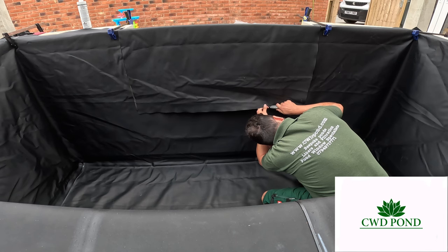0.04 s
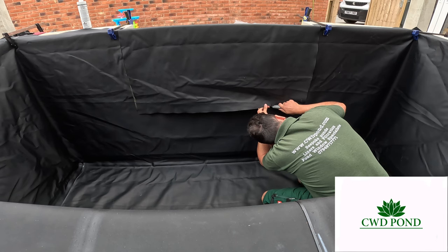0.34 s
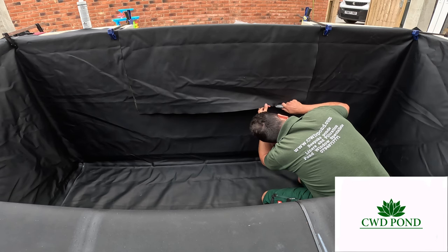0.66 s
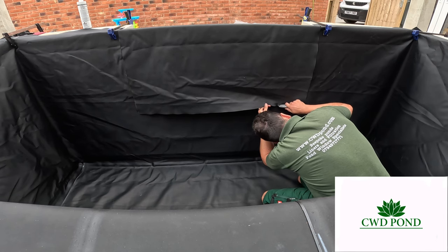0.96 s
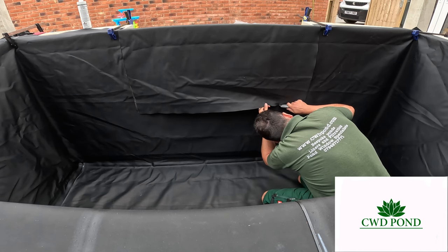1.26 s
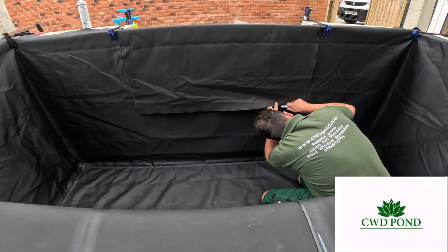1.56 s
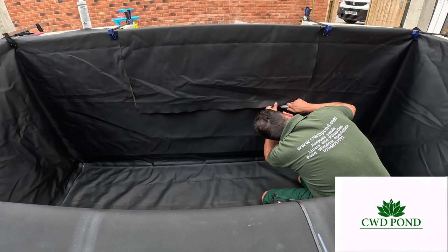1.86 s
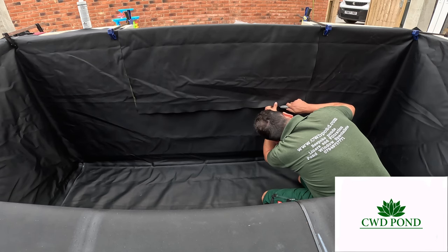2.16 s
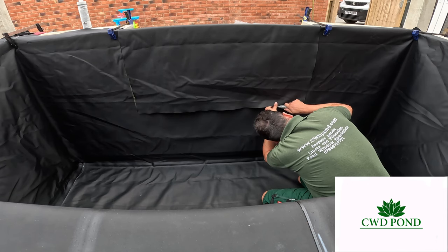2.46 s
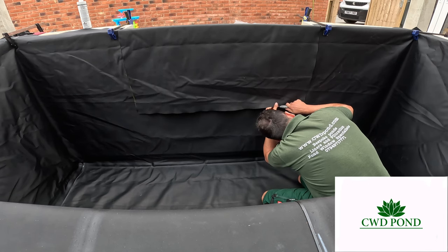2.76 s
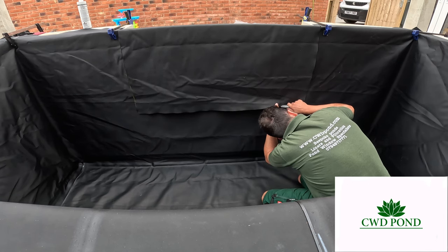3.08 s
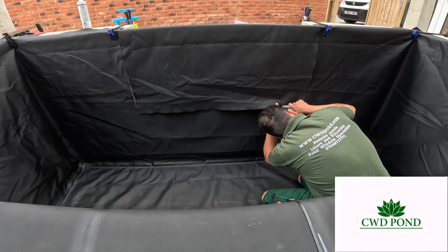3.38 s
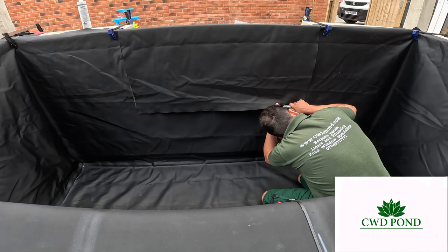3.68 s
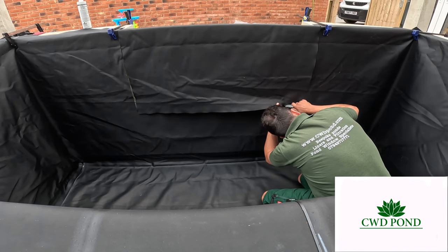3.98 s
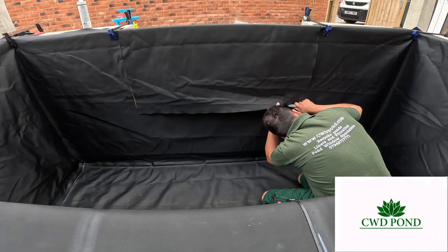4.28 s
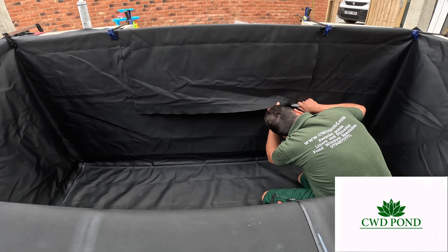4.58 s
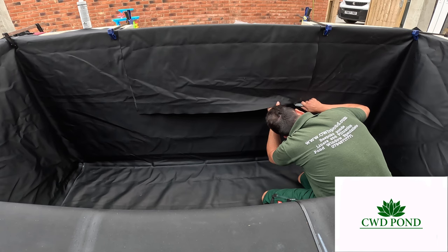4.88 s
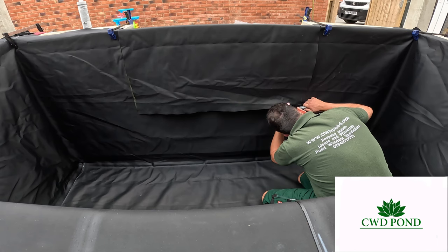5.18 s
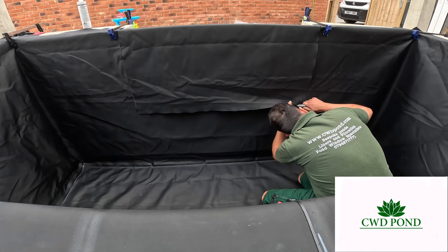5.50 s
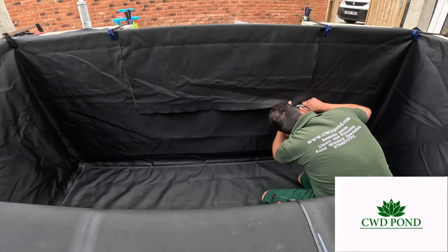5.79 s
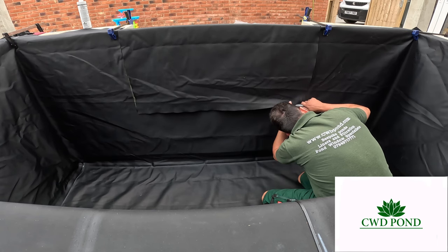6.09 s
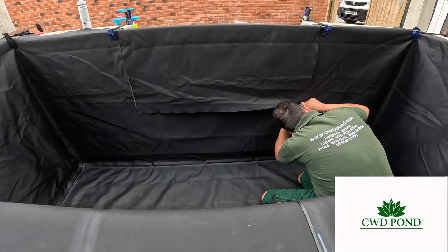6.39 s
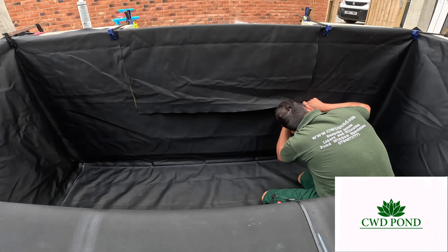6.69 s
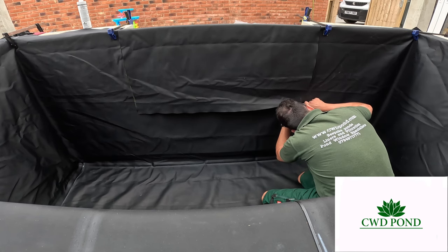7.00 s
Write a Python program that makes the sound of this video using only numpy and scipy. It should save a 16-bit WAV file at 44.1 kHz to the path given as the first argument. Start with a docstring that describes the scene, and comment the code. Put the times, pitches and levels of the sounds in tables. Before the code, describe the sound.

Short rubbery squeaks, scrapes and small dry snaps come from a liner being worked by hand, with a low engine hum outside.

```python
"""A rubber pond liner scrapes, squeaks and snaps as someone kneels in the empty pond and works along
its edge with a hand tool. Scrapes are dense trains of tiny slips, squeaks are rubber sticking and
slipping at an audible rate, and snaps are folds letting go. The lined walls throw each sound back.
Outside, an engine idles with a low hum, under light wind and distant traffic."""
import sys
import numpy as np
from scipy import signal
from scipy.fft import rfft, irfft, next_fast_len
from scipy.io import wavfile
from scipy.ndimage import uniform_filter1d, map_coordinates

SR = 44100
rng = np.random.default_rng(int(sys.argv[2]) if len(sys.argv) > 2 else 0)


def int16_out(signal):
    """Quantize to a 16-bit WAV file."""
    q = np.round(np.clip(np.atleast_2d(signal).T, -1, 1) * 32767)
    wavfile.write(sys.argv[1], SR, q.astype(np.int16))


N = 319677
TIME = np.arange(N) / SR
SQUEAK_HOLD_S = 0.00775
SNAP_LEAD = 128  # samples of room before each burst

# Short squeaks, one glide each:
# start_s, rise_s, fall_s, first_slip_hz, last_slip_hz, level_db, roughness (0-1), overtones_db
SQUEAK_GLIDES = [(1.128, .005, .008, 6500, 6900, -62, 0.25, -15),
                 (1.138, 0.014, 0.041, 9500, 8400, -66.5, 0.7, -12),
                 (1.146, 0.0054, 0.038, 4290, 3830, -61.5, 0.43, 0),
                 (1.172, 0.011, 0.017, 7200, 6630, -61, 0.3, 2),
                 (1.477, 0.005, 0.052, 1850, 1704, -53, 0.47, -19),
                 (1.548, 0.028, 0.019, 1298, 1800, -48, 0.23, -6),
                 (1.577, 0.018, 0.011, 2960, 3100, -51.5, 0.26, -21),
                 (1.617, 0.009, 0.013, 1780, 1920, -52.5, 0.34, -12),
                 (1.955, .025, 0.038, 6900, 6660, -78.5, 0.2, -18),
                 (3.172, 0.021, 0.017, 1582, 1888, -54, 0.13, 7.5),
                 (3.205, 0.005, .008, 2050, 1860, -54, 0, -6),
                 (3.218, 0.0063, 0.012, 1530, 1380, -49.5, 0.26, -9),
                 (3.253, 0.02, 0.011, 1230, 1750, -48.5, 0.29, 1.5),
                 (3.269, 0.0058, 0.011, 2200, 2020, -57, 0, -9),
                 (3.285, 0.016, 0.0057, 1700, 2120, -45, 0.1, -2),
                 (3.301, 0.015, 0.012, 3250, 3170, -50.5, .14, -2),
                 (3.331, 0.0061, .022, 2295, 1400, -48.5, .24, -1.5),
                 (3.35, 0.015, 0.032, 1392, 870, -58, 0.4, -1),
                 (3.376, 0.0068, .012, 2050, 1940, -51, 0.26, -17),
                 (3.504, 0.036, 0.018, 1303, 862, -59.5, 0.6, 4),
                 (3.563, 0.0069, 0.011, 1080, 1450, -51.5, 0, 1),
                 (3.581, 0.016, 0.026, 1560, 1897, -48.5, 0.2, -4),
                 (3.624, 0.023, 0.01, 1740, 3110, -54.5, 0.25, -2),
                 (3.655, 0.011, 0.013, 3900, 4690, -55, 0.25, -3),
                 (3.678, 0.0085, 0.0084, 4800, 5550, -56.5, 0.12, -3),
                 (3.68, 0.009, 0.022, 4250, 3500, -62.5, 0.35, -8),
                 (4.188, .004, 0.0097, 5900, 4100, -70, .3, -15),
                 (4.228, .008, 0.029, 7500, 7900, -69, .25, -18),
                 (4.498, 0.0047, 0.02, 6400, 6400, -68, .35, -19),
                 (5.249, .035, 0.042, 1290, 1360, -56.5, .5, -5),
                 (5.725, 0.013, 0.039, 6800, 6410, -71, 0.46, -9),
                 (6.221, 0.002, 0.0046, 2000, 1770, -48.5, 0.33, -25),
                 (6.579, 0.022, 0.0044, 5050, 6180, -61, 0.3, 1),
                 (6.599, .008, 0.013, 5400, 3900, -67, 0.33, 4),
                 (6.667, 0.022, 0.014, 2764, 2890, -58.5, 0.14, -4),
                 (6.68, 0.018, .04, 5600, 5450, -63, 0.24, -8),
                 (6.698, 0.011, 0.043, 3080, 3400, -62, .3, 6),
                 (7.11, 0.031, 0.026, 8600, 7670, -74, 0.37, -18),
                 (7.156, 0.02, 0.04, 7070, 4800, -64, 0.25, 0)]
# One long, thin squeal that sinks as the rubber grips, lets go for a moment, grips hard and climbs away:
# time_s, slip_hz, level_db
SQUEAL_PATH = [(3.95, 11060, -72), (4.026, 10830, -65.5), (4.075, 8640, -70.5), (4.16, 7180, -63.5),
               (4.186, 9630, -76), (4.202, 6460, -65), (4.207, 6180, -55.5), (4.246, 6420, -61),
               (4.283, 8000, -65), (4.304, 10200, -69.5), (4.325, 11030, -76), (4.455, 11200, -80)]


def scrapes():
    """Dense slips of the tool on rubber: a bright hiss plus a low rasp, balanced per stroke."""
    # Tool strokes: start_s, rise_s, hold_s, fall_s, level_db, rasp_db (relative to the level)
    strokes = [(1.13, 0.062, 0.021, 0.069, -68.5, -4), (1.46, 0.016, 0.031, 0.13, -71.5, 14.5),
               (1.485, 0.065, 0.067, 0.039, -58, -0.5), (3.161, 0.013, 0.022, .04, -73, 16.5),
               (3.226, 0.072, 0.028, 0.05, -48, -15), (3.323, 0.022, 0.057, 0.015, -55.5, -0.5),
               (3.452, 0.027, 0.06, .045, -59, 1.5), (3.519, 0.055, 0.037, 0.088, -53, -9),
               (5.187, 0.036, 0.065, .071, -69.5, 3), (5.238, 0.078, 0.035, 0.11, -65, 0.5),
               (5.421, 0.025, 0.013, 0.048, -67, -3), (6.57, 0.018, .024, 0.027, -69, -13),
               (6.677, 0.028, .03, 0.084, -64, -18)]
    # Tone of the friction: freq_hz, gain_db
    scrape_eq = [(400, -44), (750, -25), (1100, -0.5), (1700, -5.5), (2400, -5.5), (3100, -4), (4000, -4),
                 (5600, -6), (7600, -9.5), (10500, -20), (13000, -32), (15000, -41), (18000, -70)]
    grit = ring(coloured(slips(N, per_s=4000, spread_db=2.0), scrape_eq))
    hiss = unit_rms(signal.sosfilt(signal.butter(4, 2400, "high", fs=SR, output="sos"), grit))
    rasp = unit_rms(signal.sosfilt(signal.butter(3, [900, 2300], "band", fs=SR, output="sos"), grit))
    hiss_power, rasp_power = np.zeros((2, N))
    for start, rise, hold, fall, db, rasp_db in strokes:
        push = swell(rise, hold, fall, depth_db=21.5)
        add(hiss_power, start, (push * gain_of(db)) ** 2)
        add(rasp_power, start, (push * gain_of(db + rasp_db)) ** 2)
    return np.sqrt(hiss_power) * hiss + np.sqrt(rasp_power) * rasp


def scrape_ducking():
    """A gain that ducks the scraping while the rubber locks into a clean squeak."""
    locked = np.zeros(N)
    for start, rise, fall, _, _, _, rough, _ in SQUEAK_GLIDES:
        purity = np.clip(1 - rough / .5, 0, 1)
        add(locked, start, swell(rise, SQUEAK_HOLD_S, fall, depth_db=0) * purity)
    return 1 - .7 * np.minimum(locked, .7)


def slips(count, per_s, spread_db):
    """Friction as a random train of tiny clicks of uneven size."""
    slipping = rng.random(count) < per_s / SR
    size = np.minimum(rng.exponential(1, count), 4)
    sign = rng.choice([-1., 1.], count)
    return unit_rms(slipping * sign * gain_of(spread_db * size))


def ring(x, tuning=1, boost_db=0):
    """Narrow resonant peaks give scrapes and snaps a hollow, ringing colour."""
    # Peaks at tuning 1: pitch_hz, width_hz, gain_db
    resonances = [(1590, 47, 3), (1775, 44, 8), (2040, 50, 5), (2660, 51, 2), (2870, 40, -8),
                  (4300, 41, -17.5), (5050, 26, 2.5), (5450, 73, -1.5), (6520, 72, -7), (6800, 51, -3.5),
                  (7530, 83, -6), (9050, 45, -13)]
    out = x.copy()
    for hz, width, db in resonances:
        peak = signal.iirpeak(hz * tuning, hz / width, fs=SR)
        out += gain_of(db + boost_db) * signal.lfilter(*peak, x)
    return out


def squeaks():
    """Each squeak swells and fades, juddering and shedding grit while its slip rate glides."""
    # Tone of the grains that each catch tears loose: freq_hz, gain_db
    grit_eq = [(600, -31.5), (1500, -8), (2300, 0), (3200, 3), (4500, 4), (7500, -11.5), (11000, -23),
               (16000, -49)]
    out = np.zeros(N)
    for start, rise, fall, first_hz, last_hz, db, rough, overtones_db in SQUEAK_GLIDES:
        push = swell(rise, SQUEAK_HOLD_S, fall, depth_db=9.5)
        count = len(push)
        push *= np.minimum(TIME[:count] / (0.27 * rise), 1)  # fade in from silence
        catches, bend = judder(per_s=np.full(count, 240), decay_s=.0052, octaves=.046)
        hz = np.geomspace(first_hz, last_hz, count) * bend
        grit = gain_of(-20) * coloured(catches * slips(count, per_s=1500, spread_db=1), grit_eq)
        tone = catches * stick_slip(hz, rough, overtones_db)
        add(out, start, push * gain_of(db) * (tone + grit))
    return out


def stick_slip(hz, rough, overtones_db):
    """Rubber sticks and slips hz times a second; an unsteady grip smears pitch and overtones."""
    # Weight of the partials, taken relative to the fundamental: freq_hz, gain_db
    partial_eq = [(900, 7), (1700, 2.5), (2500, -3.5), (3400, -4.5), (4200, -7), (6000, -4), (8000, -13.5),
                  (11000, -23.5), (15000, -42), (18000, -59)]
    rough, count = np.clip(rough, 0, 1), len(hz)
    phase = phase_of(hz * (1 + 0.172 * rough * wander(count, rate_hz=1200)))
    tone = np.zeros(count)
    for k in range(1, 9):
        db = curve_at(partial_eq, k * hz) - curve_at(partial_eq, hz) + (k > 1) * overtones_db
        # uneven slips spread each partial into a rasp, the high ones most
        smear = rough * k ** .35 * (k * hz / 1300) ** .45
        shake = wander(count, rate_hz=1600) + 1j * wander(count, rate_hz=1800)
        shaken = (1 + smear * shake / np.sqrt(2)) * np.exp(1j * k * phase)
        partial = shaken.real / np.sqrt(1 + smear ** 2)
        tone += (k * hz < SR / 2) * gain_of(db) * partial
    return tone


def judder(per_s, decay_s, octaves):
    """Uneven catches of the grip, each a quick rise and a decay: returns envelope and pitch factor."""
    count, spread_db = len(per_s), 2.4
    uneven_rate = per_s * np.exp(wander(count, rate_hz=200) / 2)
    catch_index = np.cumsum(uneven_rate / SR).astype(int)
    size, pitch = np.clip(rng.standard_normal((count, 2)), -2, 2)[catch_index].T
    age_s = (np.arange(count) - np.searchsorted(catch_index, catch_index)) / SR
    envelope = gain_of(spread_db * size) * np.exp(-age_s / decay_s)
    return unit_rms(uniform_filter1d(envelope, size=24)), 2 ** (octaves * pitch)


def squeal():
    """A long, light drag: scratchy chirps crowd into one tone as the rubber grips, then scatter again."""
    full_grip_hz = 6260
    times, hz, db = np.transpose(SQUEAL_PATH)
    out, t = np.zeros(N), np.arange(times[0], times[-1], 1 / SR)
    slip_hz = np.interp(t, times, hz)
    # the lighter the grip, the higher and rougher the squeal and the rarer its catches
    slack = np.maximum(np.log2(slip_hz / full_grip_hz), 0)
    catches_per_s = 300 * (full_grip_hz / slip_hz) ** 2.5
    catches, bend = judder(catches_per_s, decay_s=.0024, octaves=.06 * (0.314 + slack))
    catches = unit_rms(catches ** np.minimum(0.35 + 1.5 * slack, 1))  # a firm grip hardly lets go
    tone = stick_slip(slip_hz * bend, rough=0.093 + 0.44 * slack, overtones_db=-1)
    add(out, times[0], gain_of(np.interp(t, times, db)) * catches * tone)
    damping = signal.butter(5, 12200, fs=SR, output="sos")  # soft rubber damps the very top
    return signal.sosfilt(damping, out + stray_chirps())


def stray_chirps():
    """Beside the long squeal, other spots of the rubber catch for a moment, mostly at a higher pitch."""
    per_s, length_s = 170, .005
    times, hz, db = np.transpose(SQUEAL_PATH)
    out, progress = np.zeros(N), np.arange(0, length_s, 1 / SR) / length_s
    envelope = np.sin(np.pi * np.sqrt(progress)) ** 2
    for start in rng.uniform(times[0], times[-1], round(per_s * (times[-1] - times[0]))):
        pitch, glide, size = np.clip(rng.standard_normal(3), -1.7, 1.7)
        octaves_up = .11 + .14 * (pitch + glide * (progress - .5) / 2)
        slip_hz = np.interp(start, times, hz) * 2 ** octaves_up
        level_db = min(np.interp(start, times, db), np.median(db)) - 1.5 + 2.5 * size
        add(out, start, gain_of(level_db) * envelope * np.sin(phase_of(slip_hz)))
    return out


def snaps():
    """Each fold lets go with a dry crack and a brief ring, tuned a little differently each time."""
    # Folds letting go, plus one faint tonal ping at 4.4 s: start_s, level_db, centre_hz, width_octaves,
    # decay_s, crack_db (relative)
    folds = [(0.261, -57.5, 2500, 1.4, 0.004, -14), (0.48, -66, 4500, 1.7, .003, -6),
             (1.477, -44.5, 2900, 1.4, 0.0026, -16), (1.759, -50, 1900, 0.7, 0.0063, -15),
             (1.768, -46, 3820, 0.78, 0.0036, -11), (2.213, -62, 2480, 1.3, 0.014, -11),
             (2.265, -47.5, 2310, 0.91, 0.006, -17), (2.713, -40.5, 5360, 0.58, 0.0033, -12.5),
             (3.129, -55.5, 5500, 6.9, 0.0046, -19), (4.397, -63.5, 5240, 0.37, 0.019, -17),
             (5.223, -55, 1355, 0.83, 0.0049, -6), (5.953, -56.5, 1920, 1.3, 0.017, -10),
             (6.221, -55.5, 4700, 0.13, 0.0065, -19), (6.435, -50, 4480, 0.77, 0.0049, -7),
             (6.718, -49, 2150, 0.084, 0.0043, -20), (6.754, -57, 4255, 0.25, .0069, -15),
             (6.882, -48.5, 1490, 0.6, 0.0052, -13)]
    out = np.zeros(N)
    for start, db, hz, octaves, decay, crack_db in folds:
        body = gain_of(db - 3) * snap_body(hz, octaves, decay)
        ringing = ring(body, tuning=rng.normal(1, 0.066), boost_db=0.5)
        add(out, start - SNAP_LEAD / SR, ringing + gain_of(db + crack_db) * crack())
    return out


def snap_body(centre_hz, octaves, decay_s):
    """A quick, dying burst of slips in one band; small folds sound higher."""
    burst = slip_burst(rise_s=0.00082, decay_s=decay_s)
    hz = bins(burst)
    band = np.exp(-.5 * (np.log2((hz + 1) / centre_hz) / octaves) ** 2)
    band /= 1 + (hz / 10500) ** 10  # roll off the top
    flex = np.exp(-.5 * (np.log2((hz + 1) / 1300) / 0.49) ** 2)  # broad snaps also flex the sheet
    return irfft(rfft(burst) * unit_rms(band + 0.33 * octaves * flex))


def crack():
    """The dry, bright edge of a snap: a burst a few milliseconds long."""
    # Tone of the crack: freq_hz, gain_db
    crack_eq = [(500, -22), (3000, 0), (6500, 2), (9500, -12.5), (11000, -11.5), (13000, -29),
                (15000, -35.5), (18000, -60)]
    burst = slip_burst(rise_s=0.00055, decay_s=.003)
    return irfft(rfft(burst) * unit_rms(gain_of(curve_at(crack_eq, bins(burst)))))


def slip_burst(rise_s, decay_s):
    """White noise with a fast attack and an exponential decay, SNAP_LEAD samples in."""
    t = TIME[:8192]
    envelope = (1 - np.exp(-t / rise_s)) * np.exp(-t / decay_s)
    return np.roll(rng.choice([-1., 1.], len(t)) * envelope, SNAP_LEAD)


def knocks():
    """The heavy rubber answers a blow of the tool with a few low, well-damped modes."""
    # Blows: start_s, level_db
    blows = [(1.478, -55), (2.268, -54.5), (5.224, -49), (5.955, -55), (6.884, -60.5)]
    # Modes of the sheet, detuned at each blow: pitch_hz, gain_db, t60_s
    modes = [(767, -9, 0.035), (1025, -10.5, 0.033), (1190, -2.5, 0.048), (1400, -5, 0.03)]
    out, t = np.zeros(N), TIME[:4096]
    for start, db in blows:
        for hz, mode_db, t60 in modes:
            tone = np.sin(2 * np.pi * hz * rng.normal(1, 0.052) * t)
            add(out, start, gain_of(db + mode_db - 60 * t / t60) * tone)
    return out


def hand_slides():
    """A light touch gives a fine hiss that crinkles as the hand crosses small folds."""
    # Passes over the sheet: start_s, rise_s, hold_s, fall_s, level_db
    passes = [(0.254, 0.43, 0.22, 0.24, -74.5), (0.953, 0.2, 0.059, 0.068, -71),
              (3.846, 0.59, 0.051, 0.091, -72), (4.551, 0.35, 0.11, 0.076, -74)]
    # Tone of the hiss: freq_hz, gain_db
    slide_eq = [(400, -37), (900, -2), (1900, 6.5), (2800, 0.5), (4000, -4), (6500, -2), (8500, -12),
                (10500, -14), (13000, -26), (17000, -44)]
    out = np.zeros(N)
    for start, rise, hold, fall, db in passes:
        touch = swell(rise, hold, fall, depth_db=5)
        crinkle_db = 1.8 * wander(len(touch), rate_hz=45)
        hiss = coloured(slips(len(touch), per_s=2400, spread_db=0.5), slide_eq)
        add(out, start, touch * gain_of(db + crinkle_db) * hiss)
    return out


def pond_echoes(x, spots=4, move_s=.33):
    """Direct sound plus echoes that crossfade as the hand moves from spot to spot."""
    out = np.array([x, x])
    for spot in range(spots):
        away = np.abs((TIME / move_s - spot) % spots - spots / 2)
        crossfade = np.cos(np.pi / 2 * np.minimum(away, 1))
        out += signal.oaconvolve((x * crossfade)[None], wall_response(), axes=1)[:, :N]
    return out


def wall_response():
    """From one spot the near walls answer within milliseconds, then a short diffuse tail dies away."""
    # Early reflections off walls and floor: delay_s, left_db, right_db
    reflections = [(.00092, -20.5, -27.5), (.0032, -8, -22), (.0052, -24.5, -8), (.0087, -19.5, -15.5),
                   (0.0097, -17, -25)]
    # Decay time of the pond: freq_hz, t60_s
    decay_times = [(200, 0.39), (1500, 0.15), (6000, 0.16), (13000, 0.16)]
    early = np.zeros((2, 12000))
    for delay, *sides_db in reflections:
        early[:, round(delay * rng.uniform(.85, 1.15) * SR)] += gain_of(sides_db)
    hz, t, noise = signal.stft(rng.standard_normal(early.shape), SR, nperseg=128)
    decay = gain_of(-60 * t / curve_at(decay_times, hz)[:, None])
    onset = np.clip(t / 0.0013, 0, 1)
    tail = signal.istft(noise * decay * onset, SR, nperseg=128)[1][:, :early.shape[1]]
    tail = tail + 0.29 * tail[::-1]  # crossfeed narrows the image
    return early + gain_of(-1.0) * tail / np.linalg.norm(tail[0])


def engine():
    """An idling engine: from afar only the firing rate and a few weak, wavering orders carry."""
    # Idle speed: time_s, firing_hz
    firing = [(0, 78.55), (.48, 76.4), (1.39, 75.93), (4.1, 76.23), (4.26, 76.8), (7.25, 74.8)]
    # Harmonics of the firing rate: multiple, relative_db
    orders = [(1, 5), (2, -26), (3, -42), (5, -27)]
    # Level of the hum, which dips briefly near the start: time_s, level_db
    fader = [(0, -38.5), (.36, -41.5), (.47, -65), (.62, -80), (.71, -45), (.98, -45), (1.4, -39),
             (2.45, -38.5), (3.3, -40.5), (7.25, -41)]
    phase = phase_of(automation(firing))
    hum = np.zeros(N)
    for k, db in orders:
        waver_db = (k > 1) * 3.2 * wander(N, rate_hz=5.4)
        hum += gain_of(db + waver_db) * np.sin(k * phase)
    level_db = automation(fader) + 1.06 * wander(N, rate_hz=8.4)
    return gain_of(level_db) * unit_rms(hum)


def traffic_drones():
    """Wavering tones and low booms of traffic passing far off."""
    # Drones: start_s, rise_s, hold_s, fall_s, pitch_hz, level_db
    drones = [(0, 0.18, 0.026, 0.17, 433, -55), (.15, 0.31, 0.074, 0.11, 197.5, -50),
              (0.473, 0.12, 0.34, 0.91, 322.8, -56), (2.6, 0.11, 0.033, 0.32, 144.8, -46),
              (4.3, 0.53, 0.28, 0.09, 152.5, -57.5), (4.252, 0.24, 0.11, 0.47, 391, -64),
              (4.9, 0.24, 0.096, 0.28, 472, -66.5), (5.15, 0.29, 0.13, 0.26, 384, -66.5),
              (6.42, 0.19, 0.089, 0.19, 39.81, -37.5)]
    out = np.zeros(N)
    for start, rise, hold, fall, hz, db in drones:
        passing = swell(rise, hold, fall, depth_db=14)
        phase = phase_of(hz * (1 + 0.028 * wander(len(passing), rate_hz=40)))
        waver_db = 2 * wander(len(passing), rate_hz=25)
        add(out, start, passing * gain_of(db + waver_db) * np.sin(phase))
    return out


def wind():
    """A steady, deep breeze with a few gusts on top."""
    # Gusts: start_s, rise_s, hold_s, fall_s, level_db
    gusts = [(0, .005, 0.065, 0.24, -49.5), (2.45, 0.036, 0.061, 0.15, -42.5),
             (2.746, 0.055, 0.024, 0.035, -40), (6.425, 0.17, 0.11, .2, -54)]
    # Tone of the wind: freq_hz, gain_db
    wind_eq = [(10, -4), (24, -7.5), (42, -1.5), (52, -3), (65, -7.5), (100, -14.5), (200, -77),
               (800, -110)]
    power = np.full(N, gain_of(-49) ** 2)  # the breeze
    for start, rise, hold, fall, db in gusts:
        add(power, start, (gain_of(db) * swell(rise, hold, fall, depth_db=8)) ** 2)
    return np.sqrt(power) * wide_noise(wind_eq)


def traffic_bed():
    """Far traffic rumbles, and the wash of the street follows its swells more gently."""
    # Ebb and flow of the traffic: time_s, level_db
    fader = [(0, -53.5), (.35, -50.5), (.9, -48), (1.55, -52), (2.2, -55), (2.8, -52.5), (3.75, -54.5),
             (4.4, -51.5), (4.7, -51.5), (5.2, -52), (5.55, -54), (6.35, -54.5), (6.95, -52), (7.25, -52.5)]
    # Tone of the rumble: freq_hz, gain_db
    rumble_eq = [(60, -16.5), (85, 3), (108, 7.5), (135, 1), (200, -2.5), (260, -12), (320, -9.5),
                 (400, -12), (480, -14.5), (600, -35.5), (900, -56.5), (3000, -86)]
    # Tone of the wash: freq_hz, gain_db
    wash_eq = [(320, -30.5), (550, -5), (838, -9.5), (989, -2), (1340, -0.5), (1610, -5), (1730, -5.5),
               (2300, -12), (2480, -12.5), (2850, -15), (3870, -24), (5000, -23.5), (6970, -27),
               (7620, -30), (11600, -42.5), (15100, -74), (22000, -120)]
    traffic_db = automation(fader)
    rumble_db = traffic_db + 0.97
    wash_db = -63.5 + 0.64 * (traffic_db - traffic_db.mean())
    return gain_of(rumble_db) * wide_noise(rumble_eq) + gain_of(wash_db) * wide_noise(wash_eq)


def wide_noise(eq):
    """Noise shaped by an EQ curve, nearly mono in the bass and wider in the treble."""
    # Stereo image: freq_hz, left-right correlation (0-1)
    image = [(60, 0.97), (130, 1), (270, 0.87), (560, 0.72), (1200, 0.66), (2500, 0.32), (5300, 0.64),
             (11000, 0.11)]
    left, other = rfft(rng.standard_normal((2, next_fast_len(N, True))))
    hz = np.linspace(0, SR / 2, len(left))
    correlation = curve_at(image, hz)
    right = correlation * left + np.sqrt(1 - correlation ** 2) * other
    return unit_rms(irfft(np.array([left, right]) * gain_of(curve_at(eq, hz)))[:, :N])


def swell(rise, hold, fall, depth_db):
    """A soft-edged envelope that climbs depth_db to full level, holds, and sinks again."""
    times = np.cumsum([0, rise, hold, fall])
    t = np.arange(0, times[-1], 1 / SR)
    gate = np.clip(np.minimum(t, times[-1] - t) / 0.0012, 0, 1)
    return gate * gain_of(np.interp(t, times, [-depth_db, 0, 0, -depth_db]))


def wander(count, rate_hz):
    """Smooth random modulation of rms 1 that changes rate_hz times a second."""
    knots = rng.standard_normal(count)[:int(count * rate_hz / SR) + 4]
    return unit_rms(map_coordinates(knots, [np.arange(count) * rate_hz / SR], order=2, mode="nearest"))


def coloured(x, eq):
    """Shapes x with an EQ curve, at rms 1."""
    return unit_rms(irfft(rfft(x) * gain_of(curve_at(eq, bins(x))), x.shape[-1]))


def curve_at(points, hz):
    """Reads a curve on a log-frequency axis."""
    freqs, values = np.transpose(points)
    return np.interp(np.log(hz + 1), np.log(freqs + 1), values)


def automation(points):
    """Joins (time_s, value) points with straight lines across the scene."""
    return np.interp(TIME, *np.transpose(points))


def phase_of(hz):
    """Running phase of a moving pitch, in radians."""
    return 2 * np.pi * np.cumsum(hz) / SR


def bins(x):
    """The frequencies of the spectrum of x."""
    return np.fft.rfftfreq(x.shape[-1], 1 / SR)


def gain_of(db):
    """Decibels to gain."""
    return 10 ** (np.asarray(db) / 20)


def unit_rms(x):
    """Scales to rms 1."""
    return x / np.sqrt(np.mean(x ** 2) + 1e-20)


def add(mix, start_s, sound):
    """Lays a sound into the mix at start_s."""
    part = mix[max(round(start_s * SR), 0):][:len(sound)]
    part += sound[:len(part)]


def scene():
    """The liner sounds inside the pond, with the street around it."""
    liner = scrapes() * scrape_ducking() + hand_slides() + squeaks() + squeal() + snaps() + knocks()
    return pond_echoes(liner) + engine() + traffic_drones() + wind() + traffic_bed()


def record(dry):
    """A steep 15 kHz low-pass over the whole mix."""
    lowpass = signal.firwin(511, 15000, window=("kaiser", 9), fs=SR)
    return signal.oaconvolve(dry, lowpass[None], "same")


dry = scene()
out = record(dry)
int16_out(out)
```